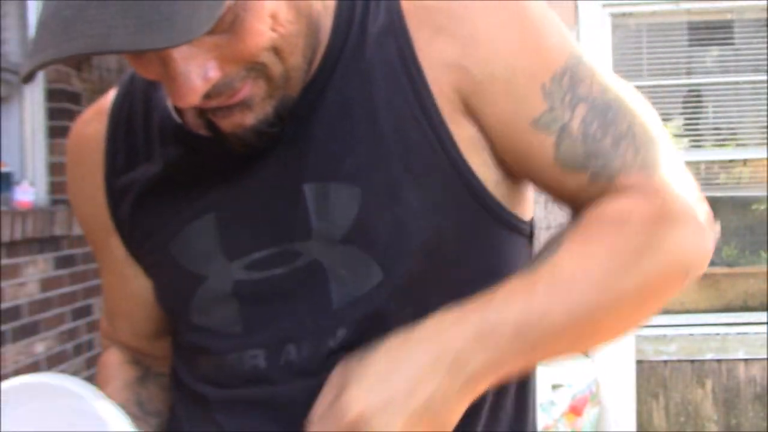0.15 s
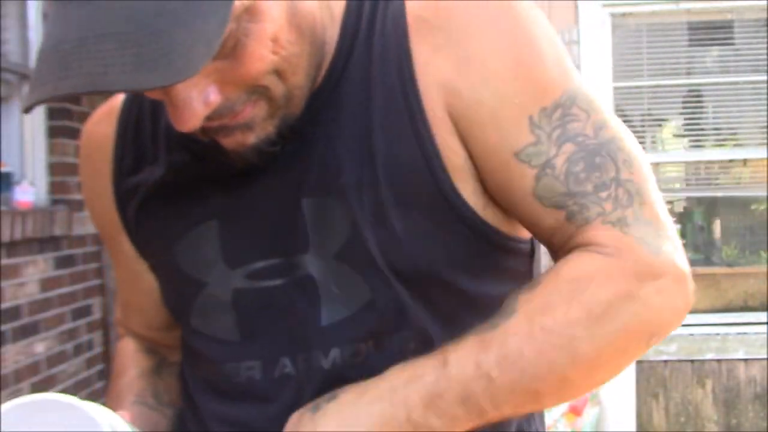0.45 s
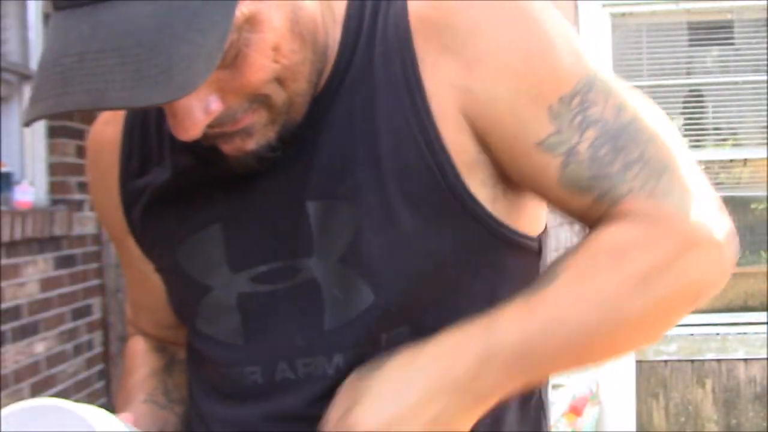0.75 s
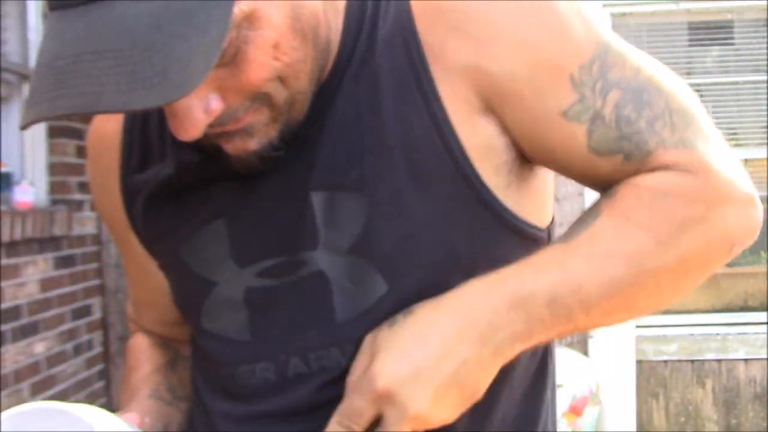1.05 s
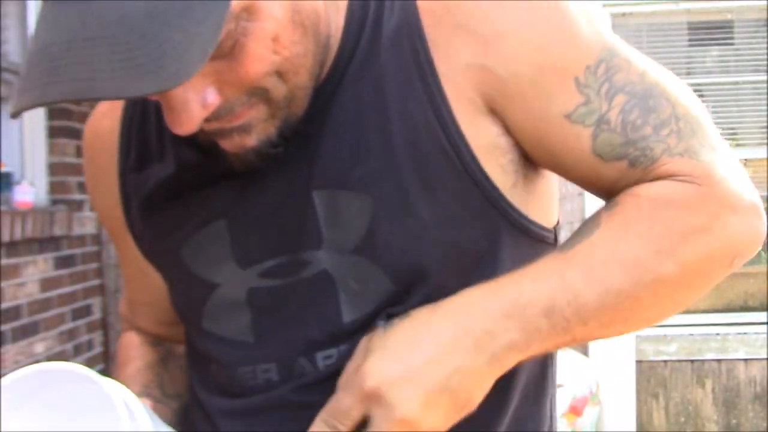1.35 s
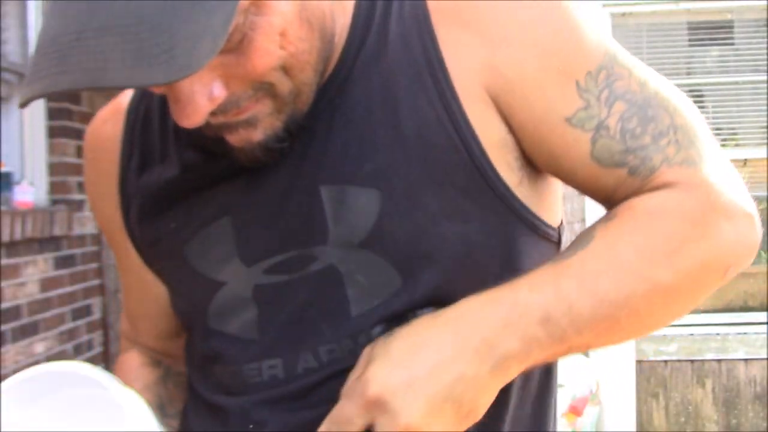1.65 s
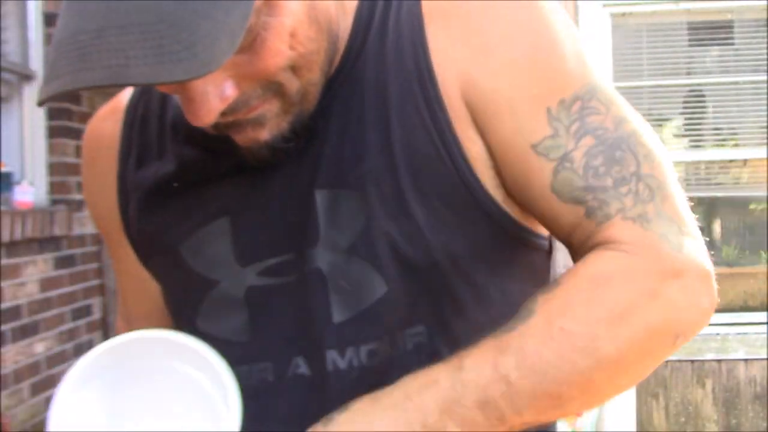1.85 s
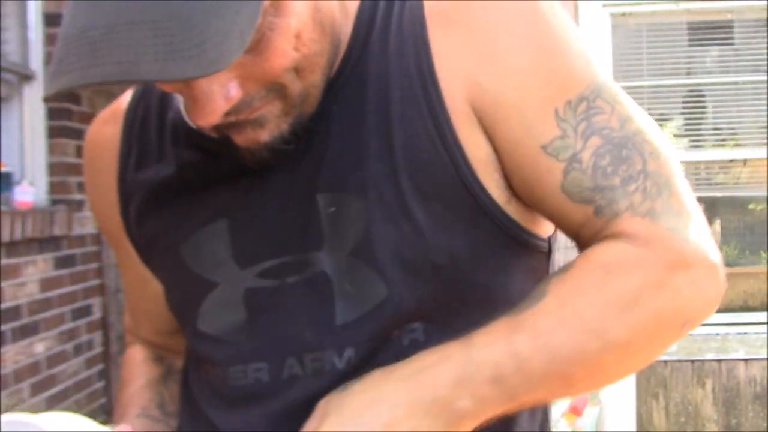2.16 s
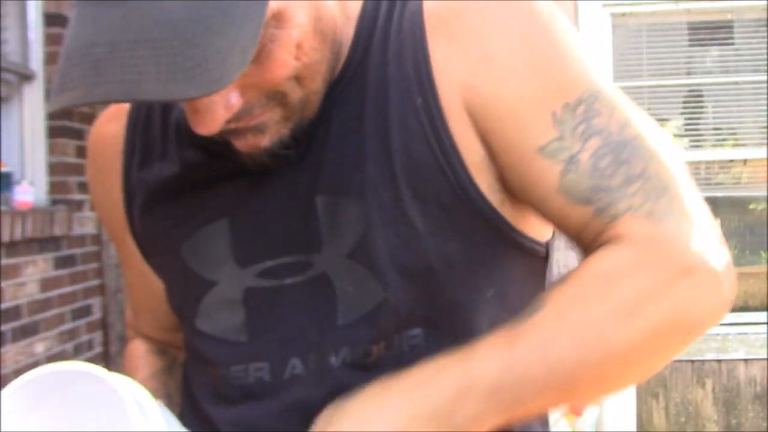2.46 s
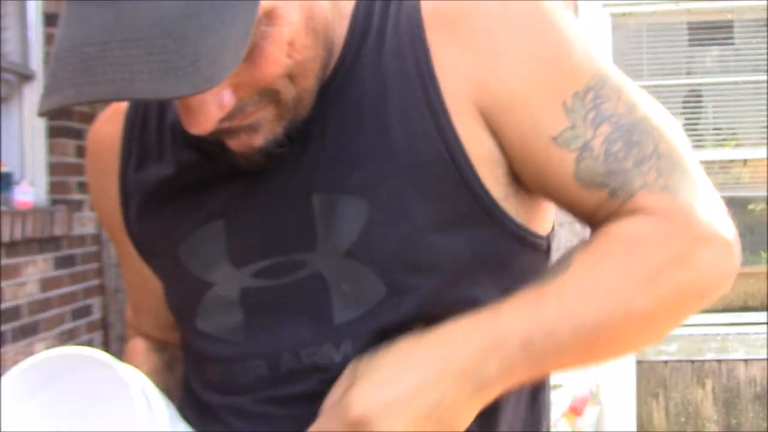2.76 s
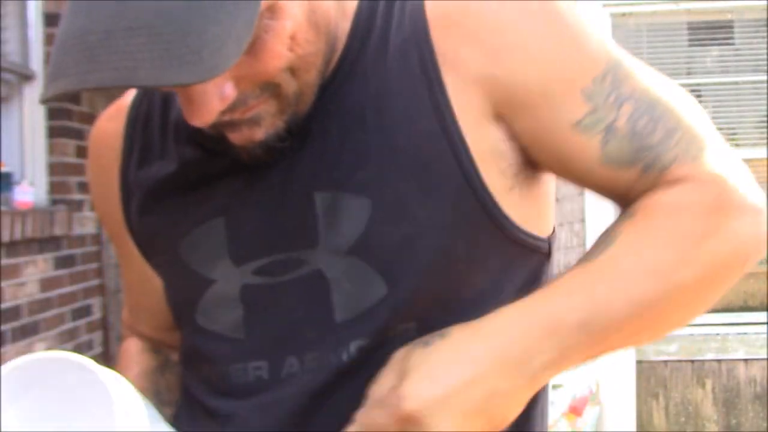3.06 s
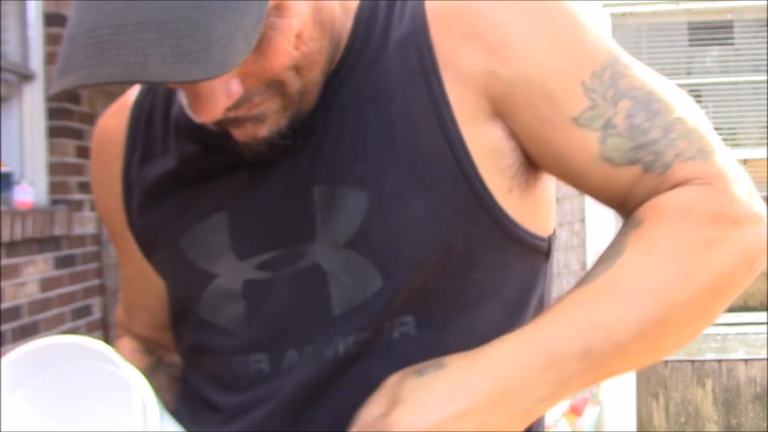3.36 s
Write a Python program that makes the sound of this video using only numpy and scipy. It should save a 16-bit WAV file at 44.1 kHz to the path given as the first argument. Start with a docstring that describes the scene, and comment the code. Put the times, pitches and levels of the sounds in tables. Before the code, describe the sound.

A hand file rasps rapidly back and forth on a hollow plastic pipe fitting outdoors

```python
"""A hand file rasps quickly to and fro over the rim of a plastic pipe fitting, outdoors by a house wall.
It opens on steady strokes with a few knocks; past one second the file skips and knocks in a dense cluster.
The strokes thin out into a short rest near 1.5 s, then return mostly heavier, with pings and more knocks.
Teeth tear the plastic in dense tiny snaps that ring the hollow fitting and the blade; knocks are clicks
with a brief crunch. Wall reflections, a diffuse tail and quiet outdoor air surround the work."""
import sys
import numpy as np
from scipy import signal
from scipy.fft import rfft, irfft
from scipy.io import wavfile
from scipy.ndimage import uniform_filter1d, minimum_filter1d

SR = 44100
rng = np.random.default_rng(int(sys.argv[2]) if len(sys.argv) > 2 else 0)


def to_wav(s):
    """Save 16-bit WAV."""
    ch = np.atleast_2d(s).T  # columns
    pcm = np.round(np.clip(ch, -1, 1) * 32767)  # PCM
    wavfile.write(sys.argv[1], SR, pcm.astype(np.int16))


N = 154350   # samples, 3.5 s

# band edges shared by the strokes and the knocks: body | bite | hiss | fizz
BODY_TOP_HZ, BITE_TOP_HZ, HISS_TOP_HZ = 860, 3025, 9200

START_DB, END_DB = -27.5, -42   # body and bite: level at first touch, and one fall time after the hold
HISS_START_DB, HISS_END_DB = -18.5, -56   # the same for hiss and fizz
BITE_GROWTH = 0.13   # share of the dulling that moves into the bite
BLADE_Q, BLADE_GAIN = 20, 1
# force of the teeth on the plastic: (frequency [Hz], relative level [dB per Hz])
TEETH_FORCE = [(40, -70), (90, -32), (160, -2.5), (300, 1.5), (500, 1), (850, -7.5), (1450, -9.5),
               (2400, -7), (3150, -15), (4300, -15), (5500, -19.5), (8000, -20.5), (8900, -28),
               (11800, -27), (15500, -41)]
# file strokes: (start [s], rise [s], hold [s], fall [s], hollow body level [dB], bite level [dB],
#   mid-stroke hiss level [dB], fizz over hiss [dB], hiss lost over rise and hold [dB],
#   blade ring [Hz], hollow resonance at mid-glide [Hz])
FILE_STROKES = [ (0.049, 0.0055, 0.01, 0.027, -19, -20.5, -25.5, 3.5, 4, 4600, 253),
                (0.188, 0.036, 0.037, 0.1, -19, -18.5, -20.5, -0.5, 0.5, 4500, 444),
                (0.326, 0.035, 0.031, 0.074, -18.5, -14.5, -21.5, 0, -0.5, 4450, 620),
                (0.43, 0.019, 0.049, 0.091, -19, -20.5, -24.5, 6, 1, 7400, 540),
                (0.554, 0.03, 0.047, 0.08, -18, -17.5, -25.5, 3.5, -6.5, 4360, 555),
                (0.671, .028, 0.045, 0.052, -19.5, -22, -28, 9.5, 1.5, 5100, 534),
                (0.799, 0.025, 0.041, 0.09, -19, -18.5, -28.5, 2, -6.5, 3240, 587),
                (0.911, 0.028, 0.056, 0.036, -19, -24, -28.5, 6, 9, 7450, 470),
                (1.044, 0.051, 0.01, 0.1, -16.5, -16.5, -24, 2.5, -5, 6040, 510),
                (1.247, 0.027, 0.019, 0.032, -21, -23.5, -23.5, -6, -3.5, 2960, 278),
                (1.337, 0.019, 0.061, 0.063, -23.5, -28.5, -40.5, -6, -2, 4900, 290),
                (1.449, 0.036, 0.036, 0.045, -54, -46.5, -58, -7, -6, 2360, 493),
                (1.807, 0.039, 0.047, 0.063, -14, -15.5, -21.5, 0, -1, 6640, 510),
                (1.963, 0.025, 0.05, 0.068, -13.5, -9, -16, -4, 2, 4750, 1010),
                (2.1203, 0.0057, 0.031, 0.034, -18, -13.5, -13, 1, 4, 3720, 490),
                (2.251, 0.017, 0.052, 0.058, -19.5, -24, -34.5, -5, -2, 4850, 1010),
                (2.379, .026, 0.054, 0.027, -13.5, -12.5, -17, 2, 2, 5900, 415),
                (2.515, 0.016, 0.063, 0.073, -17.5, -20, -24.5, 2, 0.5, 4900, 527),
                (2.641, 0.017, 0.035, 0.036, -16, -18.5, -22.5, 5, 2, 6660, 493),
                (2.806, 0.053, .012, 0.042, -15.5, -22, -32, -9, -9, 4900, 555),
                (2.911, 0.026, 0.063, 0.071, -14.5, -15.5, -19, 2, -2, 6260, 376),
                (3.044, 0.022, 0.084, 0.09, -14.5, -13, -17, -1.5, 12.5, 6800, 930),
                (3.203, 0.017, 0.063, 0.06, -16, -20, -23.5, 2, 2, 5060, 412),
                (3.327, 0.033, 0.037, 0.077, -8.5, -7, -13.5, -1.5, -1, 6900, 1780),
                (3.45, 0.026, 0.034, .030, -20, -21.5, -26.5, 5.5, 4, 4900, 510)]


def rasping():
    """Snaps ring the fitting; each stroke has its own weight, bite, hiss and resonances."""
    body, bite, hiss, fizz = rasp_bands()
    out = np.zeros(N)
    for (start, rise, hold, fall, body_db, bite_db, hiss_db, fizz_db,
         dulling_db, ring_hz, hollow_hz) in FILE_STROKES:
        first = int(start * SR)
        span = slice(first, min(first + SR // 4, N))
        t = np.arange(span.stop - span.start) / SR
        dulled_db = dulling_db * (np.minimum(t / (rise + hold), 1) - .5)
        push = stroke_shape(t, rise, hold, fall, START_DB, END_DB)
        hiss_push = stroke_shape(t, rise, hold, fall, HISS_START_DB, HISS_END_DB)
        treble = hiss[span] + from_db(fizz_db) * fizz[span]
        scrape = from_db(bite_db + BITE_GROWTH * dulled_db) * bite[span] * push
        scrape += from_db(hiss_db - dulled_db) * treble * hiss_push
        stroke = from_db(body_db) * body[span] * push + blade_echoes(scrape, t)
        ringing = resonate(stroke, ring_hz, BLADE_Q, BLADE_GAIN)
        out[span] += gliding_hollow(ringing, t, hollow_hz, rise + hold + fall / 2)
    return out


def rasp_bands():
    """Endless rasp on the fitting, split into body, bite, hiss and fizz to be balanced per stroke."""
    sound = rfft(ring_fitting(snaps(), TEETH_FORCE), 2 * N)
    hz = np.arange(N + 1) * SR / (2 * N)
    below = [1 / (1 + (hz / edge) ** 8) for edge in (BODY_TOP_HZ, BITE_TOP_HZ, HISS_TOP_HZ)]
    shares = np.diff(below, axis=0, prepend=0, append=1)
    body, bite, hiss, fizz = (irfft(sound * share)[:N] for share in shares)
    return rms_one(body), rms_one(bite), rms_one(hiss), fizz / hiss.std()   # fizz is set against hiss


SNAPS_PER_S, SNAP_SPREAD_DB = 2600, 2.5
# the file grips and slips: median rate, spread of the gaps (log), decay, boost and its spread
CATCHES_PER_S, CATCH_JITTER, CATCH_S, CATCH_DEPTH, CATCH_SPREAD_DB = 135, .35, 0.0019, 1.49, 5.5


def snaps():
    """Tiny tearing snaps of uneven size, boosted just after each grip of the file."""
    gaps = np.exp(CATCH_JITTER * rng.standard_normal(size=1500)) / CATCHES_PER_S
    grips = np.concatenate([[0], np.cumsum(gaps)])
    t = np.arange(N) / SR
    last = np.searchsorted(grips, t, side="right") - 1
    strength = CATCH_DEPTH * from_db(CATCH_SPREAD_DB * rng.standard_normal(len(grips)))
    grip = 1 + strength[last] * np.exp(-(t - grips[last]) / CATCH_S)
    sizes = from_db(SNAP_SPREAD_DB * np.minimum(rng.exponential(1, N), 4))
    signs = rng.choice([-1, 1], N)
    return grip * sizes * signs * (rng.random(N) < SNAPS_PER_S / SR)


TOUCH_S = .002   # click-free fade-in


def stroke_shape(t, rise, hold, fall, start_db, end_db):
    """Level of a stroke as the file speeds up, runs and slows to the turn."""
    rising = np.clip(1 - t / rise, 0, 1)
    falling = np.maximum(t - rise - hold, 0) / fall
    return from_db(start_db * rising ** 1.6 + end_db * falling ** .9) * np.minimum(t / TOUCH_S, 1)


# waves return from the file's ends: central delay, log spread, log slide over the span, gain
BLADE_ECHO_S, BLADE_ECHO_SPREAD, BLADE_TRAVEL, BLADE_ECHO_GAIN = .0022, .4, 0.13, 0.36


def blade_echoes(x, t):
    """Two reflections along the blade; their delays differ each stroke and slide as the file travels."""
    out = x
    for offset, way in zip(rng.uniform(-1.053, 1, 2), (1, -1)):
        stretch = BLADE_ECHO_SPREAD * (offset + way) + way * BLADE_TRAVEL * t / t[-1]
        delay = BLADE_ECHO_S * np.exp(stretch)
        out = out + way * BLADE_ECHO_GAIN * np.interp(t - delay, t, x, left=0)
    return out / np.sqrt(1 + 2 * BLADE_ECHO_GAIN ** 2)


HOLLOW_Q, HOLLOW_GAIN = 7, .9
HOLLOW_GLIDE_OCT = 0.34   # total rise as the contact travels along the blade


def gliding_hollow(x, t, hz, length):
    """Lifts a resonance that climbs through the stroke."""
    centre = hz * 2 ** (HOLLOW_GLIDE_OCT * (np.minimum(t / length, 1) - .5))
    turn = np.exp(2j * np.pi * np.cumsum(centre) / SR)
    r = np.exp(-np.pi * hz / HOLLOW_Q / SR)
    # shift the moving centre to 0 Hz, smooth there, shift back
    smooth = signal.lfilter([1 - r], [1, -r], x / turn)
    return x + HOLLOW_GAIN * 2 * np.real(turn * smooth)


# resonances of the fitting: (frequency [Hz], width [Hz], lift [dB])
FITTING_MODES = [(230.5, 45, 6), (285, 13.3, 6), (391.3, 104, 8), (543, 120, 9), (651, 150, 5),
                 (790, 21, 8.5), (972, 310, 8.5), (1153, 250, 9.5), (1805, 440, 8), (2156, 350, 6.5),
                 (2296, 50, -7.5), (2718, 440, 6.5), (3470, 87, 6), (6540, 360, 5)]


def ring_fitting(x, force):
    """A contact force drives the plastic fitting, whose modes lift their own bands."""
    return colour(x, spectrum_db(force, FITTING_MODES))


KNOCK_DB = 13.5   # added to every knock
CRUNCH_DB, CRUNCH_S = -14, .0022
KNOCK_RING_HZ, KNOCK_RING_Q, KNOCK_RING_GAIN = 4900, 16, 0.93
# force of a knock: (frequency [Hz], relative level [dB per Hz])
KNOCK_FORCE = [(40, -1), (100, -2.5), (200, 4.5), (600, 4), (1450, -15), (2400, -8.5), (3300, -15.5),
               (5000, -18.5), (7000, -22.5), (9500, -34), (15500, -44)]
# the file knocks on the rim: (time [s], strength relative to KNOCK_DB [dB], treble lift [dB])
RIM_KNOCKS = [ (.051, -2, 4.5), (.064, 1, 6), (0.1488, 4.5, 13), (.158, -11, -16), (1.074, 2, 8),
              (1.106, 13, 13), (1.138, -6, -16), (1.170, -11, 8), (1.1936, 5, 3), (1.201, -5, 0),
              (1.285, 8.5, 2), (1.295, 6, 22), (1.342, -13.5, -5), (1.356, -0.5, -2), (1.367, -16, -13),
              (1.377, 5.5, 26), (1.384, -11, -6), (1.394, -11, -3), (1.409, 3, 8), (1.425, -13.5, -2),
              (1.660, -25.5, -13), (1.693, -19, 6), (2.086, 3, 5), (2.126, 17, 6), (2.161, -6.5, -0.5),
              (2.249, -6.5, -3.5), (2.2632, 7, -11.5), (2.284, 5, 12), (2.303, 8, 10.5), (2.3333, 6, 9.5),
              (2.850, 18.5, 11), (2.860, 9.5, 10), (2.887, -10, 3), (3.019, -10, 1), (3.222, 3, -5),
              (3.273, 8.5, 20)]


def knocking():
    """Each knock is a click with a brief crunch, ringing the fitting and the blade."""
    force, t = np.zeros(N + SR), np.arange(SR // 40) / SR
    for s, db, bright_db in RIM_KNOCKS:
        burst = rng.standard_normal(len(t)) * np.exp(-t / CRUNCH_S)
        blow = (t == 0) + from_db(CRUNCH_DB) * cut(burst, BODY_TOP_HZ, "high", order=1)
        blow = blow + (from_db(bright_db) - 1) * cut(blow, BITE_TOP_HZ, "high", order=1)
        unit_blow = blow / np.sqrt(np.sum(blow ** 2))
        first = int(s * SR)
        force[first:first + len(t)] += from_db(db + KNOCK_DB) * unit_blow
    fitting = disperse(ring_fitting(force[:N], KNOCK_FORCE))
    return resonate(fitting, KNOCK_RING_HZ, KNOCK_RING_Q, KNOCK_RING_GAIN)


BASS_LAG_S, BASS_LAG_HZ = 0.001995, 4070   # lag at 0 Hz, and the scale over which it fades


def disperse(x):
    """Bending waves carry lows slower through the plastic, so a click spreads into a falling chirp."""
    hz = np.arange(N + 1) * SR / (2 * N)
    phase = 2 * np.pi * BASS_LAG_S * BASS_LAG_HZ * (1 - np.exp(-hz / BASS_LAG_HZ))
    return irfft(rfft(x, 2 * N) * np.exp(-1j * phase))[:N]


PING_Q = 7.2
# single teeth ping and squeak: (time [s], level before decay [dB], pitch [Hz], decay [s])
TOOTH_PINGS = [(1.544, -38, 8600, 0.0012), (1.551, -37.5, 7200, 0.0028), (1.814, -22, 5800, 0.0025),
               (1.892, -7.5, 7800, 0.0044), (1.915, -17, 7250, 0.0026), (2.031, -9, 7330, 0.0037)]


def pinging():
    """Brief bright squeaks of the steel on the rim: narrow noise that dies away."""
    out, t = np.zeros(N), np.arange(SR // 20) / SR
    for s, db, hz, decay in TOOTH_PINGS:
        noise = rng.standard_normal(len(t))
        ring = rms_one(signal.lfilter(*signal.iirpeak(hz, PING_Q, fs=SR), noise))
        first = int(s * SR)
        out[first:first + len(t)] += from_db(db) * ring * np.exp(-t / decay)
    return out


YARD_DB, YARD_T60_S, YARD_TREBLE_T60_S = -20.5, 0.24, 0.24
YARD_SPLIT_HZ, YARD_TREBLE_DB, YARD_WIDTH = 7400, -14, 0.19
# close reflections: (delay [s], level [dB])
WALL_REFLECTIONS = [(.0061, -21.5), (0.0104, -28.5), (0.0182, -19.5)]


def yard(x):
    """Close wall reflections, then a faint diffuse tail with subdued treble."""
    t = np.arange(SR // 2) / SR
    near = x + sum(from_db(db) * np.pad(x, (int(s * SR), 0))[:N] for s, db in WALL_REFLECTIONS)
    noise = rng.standard_normal((2, len(t)))
    low = cut(noise, YARD_SPLIT_HZ, "low") * from_db(-60 * t / YARD_T60_S)
    high = cut(noise, YARD_SPLIT_HZ, "high") * from_db(YARD_TREBLE_DB - 60 * t / YARD_TREBLE_T60_S)
    tail = (low - high) * np.minimum(t / 0.0035, 1)   # flipped so both bands agree in phase at the split
    tail = tail / np.sqrt(np.sum(tail[0] ** 2))
    mid, side = from_db(YARD_DB) * signal.fftconvolve(x[None], tail, axes=1)[:, :N]
    return near + mid + YARD_WIDTH * side * np.array([[1], [-1]])


AIR_DB, AIR_SIDE_DB = -45, -15.5   # the side level is relative to the mid
# outdoor background: (frequency [Hz], relative level [dB per Hz])
AIR_TONE = [(30, -20), (70, -15), (130, 3.5), (300, -1), (700, -4.5), (1300, -10), (3000, -15.5),
            (7000, -25.5), (11000, -30), (16000, -38)]


def air():
    """Steady quiet outdoor background: shaped noise, mostly central."""
    mid, side = colour(rng.standard_normal((2, N)), spectrum_db(AIR_TONE))
    return from_db(AIR_DB) * (mid + from_db(AIR_SIDE_DB) * side * np.array([[1], [-1]]))


def from_db(db):
    """Decibels to gain."""
    return 10 ** (np.asarray(db) / 20)


def rms_one(x):
    """Scales to unit rms."""
    return x / np.sqrt(np.mean(x ** 2) + 1e-20)


def spectrum_db(points, modes=()):
    """A smooth slope with resonances on top, in dB on the frequency grid."""
    hz = np.arange(N + 1) * SR / (2 * N) + 1e-3   # keeps the log finite
    at, db = np.transpose(points)
    slope = np.interp(np.log(hz), np.log(at), db)
    return slope + sum(lift / (1 + (2 * (hz - f) / width) ** 2) for f, width, lift in modes)


def colour(x, db):
    """Causal (minimum-phase) filter of unit power gain with the given response."""
    cepstrum = irfft(db * np.log(10) / 20)
    cepstrum[1:N] *= 2
    cepstrum[N + 1:] = 0
    filtered = irfft(rfft(x, 2 * N) * np.exp(rfft(cepstrum)))[..., :N]
    return filtered / np.sqrt(np.mean(from_db(db) ** 2))


def cut(x, hz, kind, order=2):
    """Gentle high- or low-pass."""
    return signal.sosfilt(signal.butter(order, hz, kind, fs=SR, output="sos"), x)


def resonate(x, hz, q, gain):
    """Lifts one resonance out of the sound."""
    return x + gain * signal.lfilter(*signal.iirpeak(hz, q, fs=SR), x)


TREBLE_SIDE_DB, SIDE_HZ, PAN_DB = -23.5, 5300, 0.7   # pan is left over right


def scene():
    """The filing is close and almost straight ahead; the two ears differ slightly in the treble."""
    work = rasping() + knocking() + pinging()
    late = np.pad(work, (SR // 1000, 0))[:N]   # 1 ms
    side = from_db(TREBLE_SIDE_DB) * cut(late, SIDE_HZ, "high", order=1)
    stereo = yard(work) + air() + side * np.array([[1], [-1]])
    return stereo * from_db([[PAN_DB / 2], [-PAN_DB / 2]])


CEILING, LIMITER_S, CUTOFF_HZ = 0.82, 0.0039, 15900


def record(dry):
    """A fast look-ahead limiter holds the peaks down, then the top is cut steeply."""
    size = int(LIMITER_S * SR)
    room_left = np.minimum(1, CEILING / (np.abs(dry).max(axis=0) + 1e-9))
    gain = uniform_filter1d(minimum_filter1d(room_left, size), size)
    top_cut = signal.ellip(10, .2, 80, CUTOFF_HZ, fs=SR, output="sos")
    return signal.sosfilt(top_cut, dry * gain)


dry = scene()
out = record(dry)
to_wav(out)
```